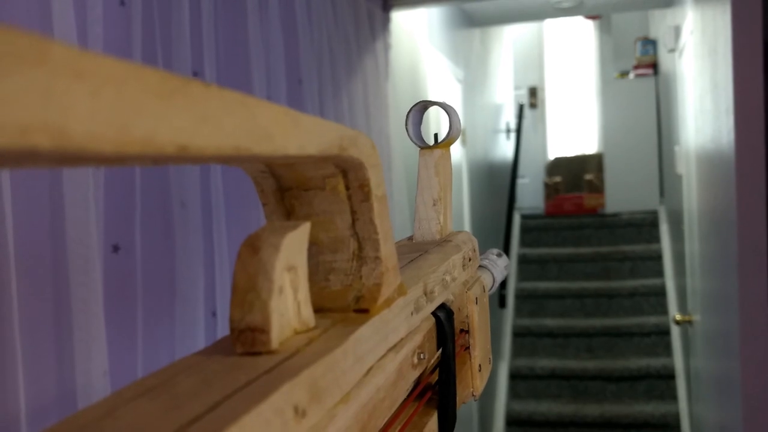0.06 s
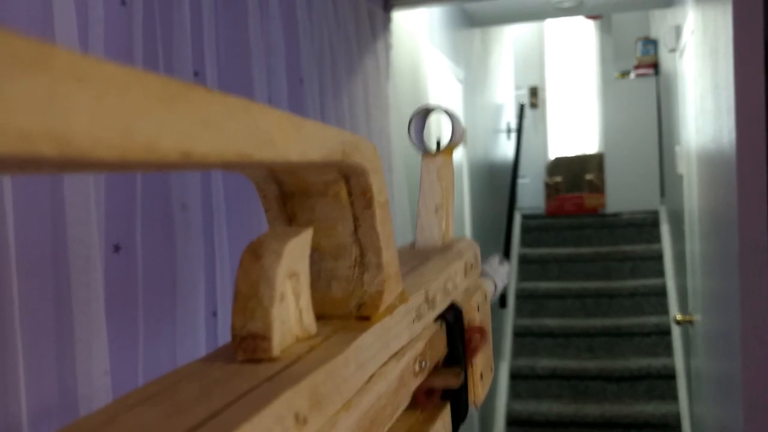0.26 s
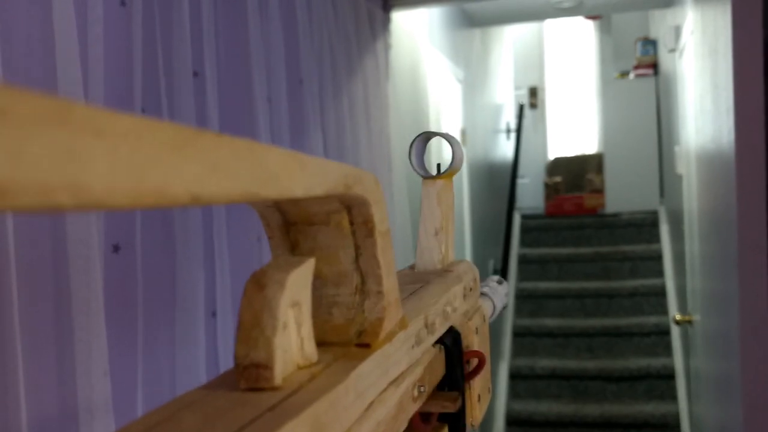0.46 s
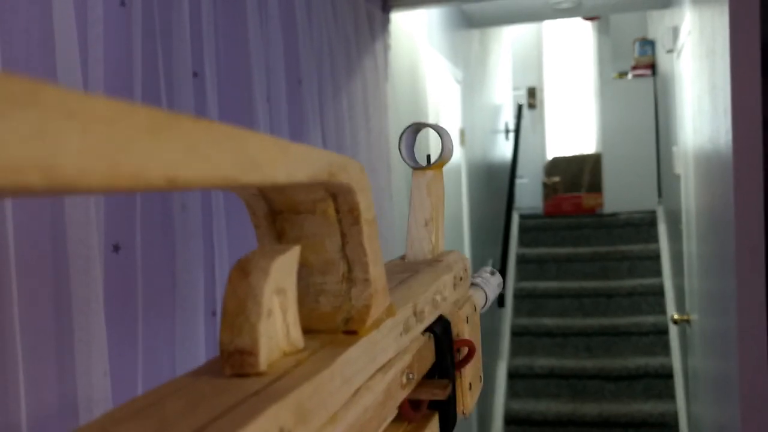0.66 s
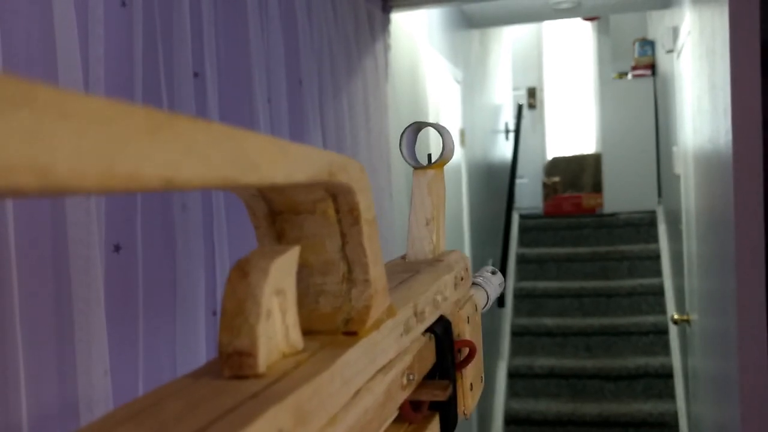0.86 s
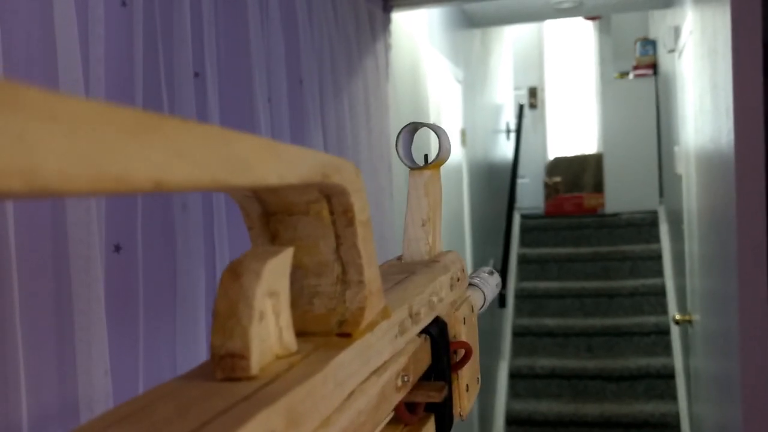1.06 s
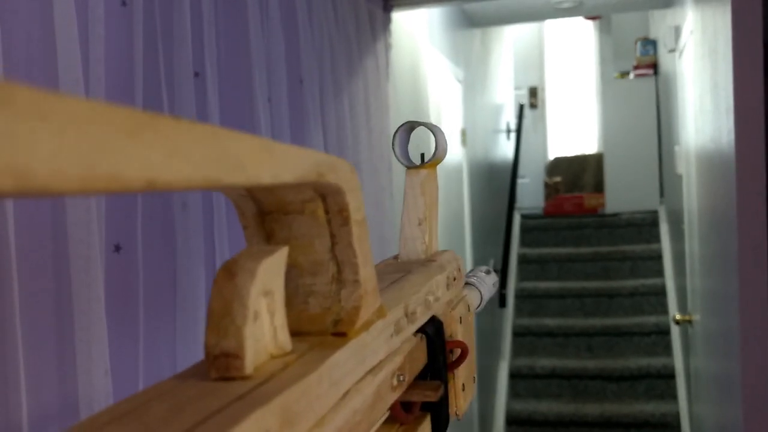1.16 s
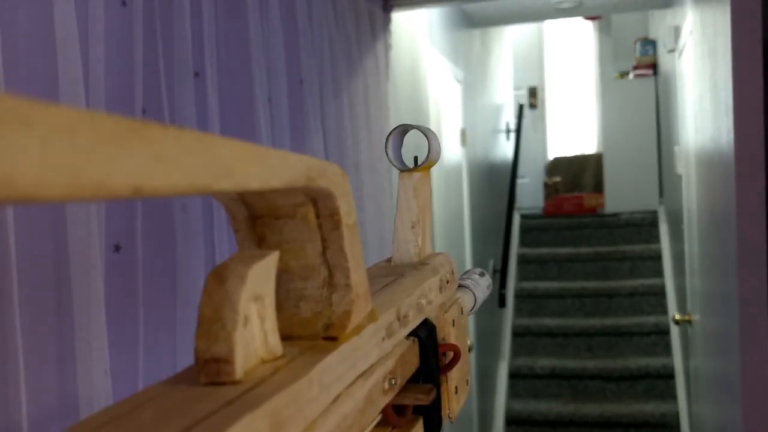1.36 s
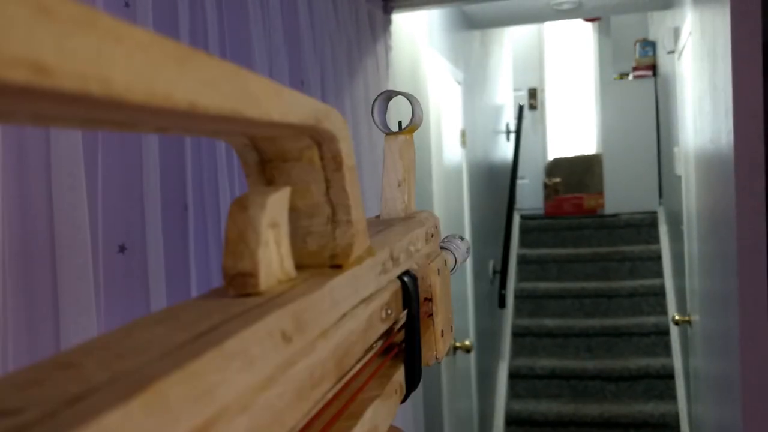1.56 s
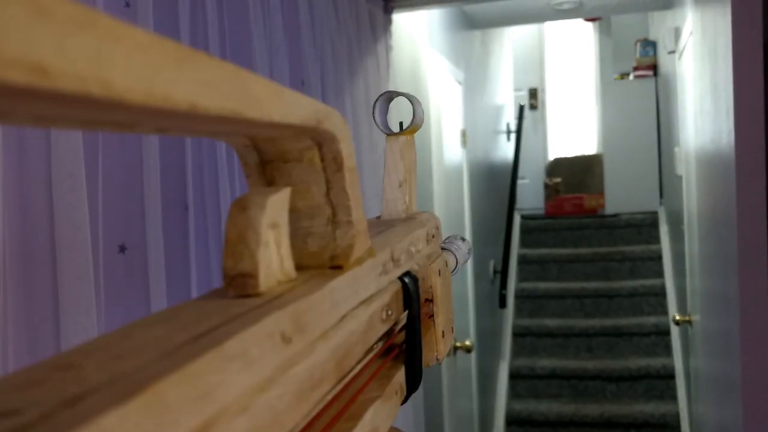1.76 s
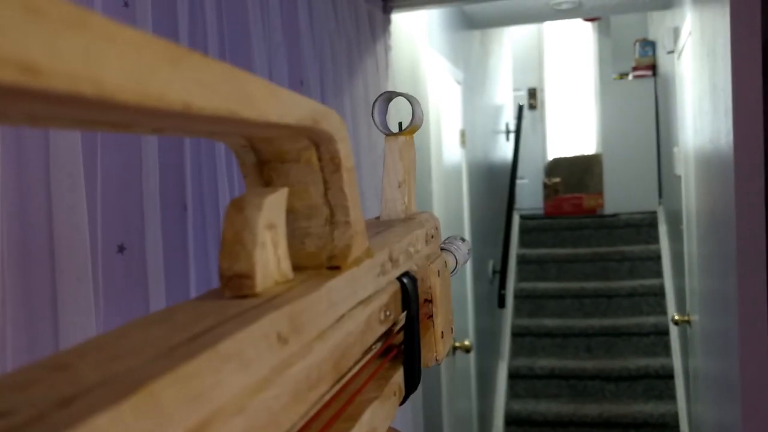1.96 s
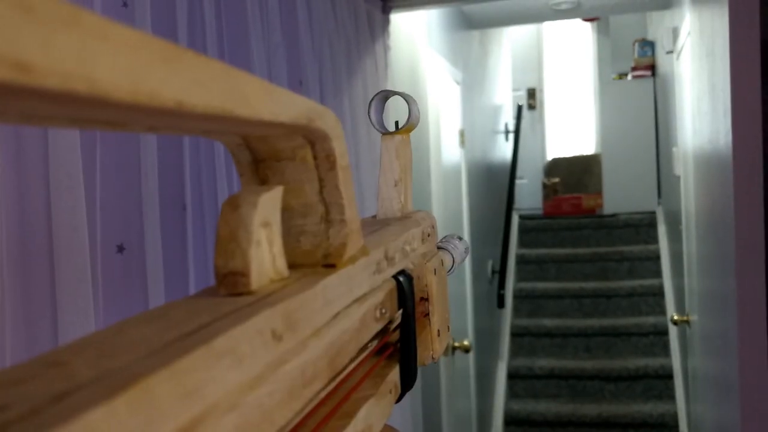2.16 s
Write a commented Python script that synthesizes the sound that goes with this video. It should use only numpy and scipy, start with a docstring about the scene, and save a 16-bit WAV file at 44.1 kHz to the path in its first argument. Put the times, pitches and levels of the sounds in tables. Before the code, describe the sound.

A wooden slingshot rifle fires once beside the microphone with a sharp overloaded rubber snap, a hollow wooden knock follows down a narrow hallway, then soft bounces, low hiss, and handling rumble returning.

```python
"""Slingshot rifle shot in a hallway

A wooden slingshot rifle fires once in a narrow hallway, right beside the microphone. Shaped noise makes the
rubber swish, crack, flap and slap; damped sines make the air puff and the knock on a board down the hall.
The shot then clacks off a hard surface and drops with soft thuds, all answered by decaying hall noise.
Hiss, hum and handling rumble lie underneath; they sink after the shot and later return."""
import sys
import numpy as np
from scipy import signal
from scipy.fft import rfft, irfft
from scipy.io import wavfile

SR = 44100
rng = np.random.default_rng(int(sys.argv[2]) if len(sys.argv) > 2 else 0)


def waveform_to_disk(signal):
    """Save audio, clipped to [-1, 1], as 16-bit WAV at the path in sys.argv[1]."""
    frames = np.transpose(np.atleast_2d(signal))
    scaled = np.clip(frames, -1, 1) * 32767
    samples = np.round(scaled).astype(np.int16)
    wavfile.write(sys.argv[1], SR, samples)


N = 97020
T = np.arange(N) / SR  # seconds
HZ = np.fft.rfftfreq(2 * N, 1 / SR)

SNAP_S, SLAP_S = .2371, .2622  # the crack; the rubber reaching the end of its throw


def amp(db):
    """Decibels to gain."""
    return 10 ** (np.asarray(db) / 20)


def unit(x):
    """Scales to rms 1."""
    return x / np.sqrt(np.mean(x ** 2) + 1e-20)


def read(points, hz):
    """Reads a table on a log-frequency axis."""
    f, value = np.transpose(points)
    return np.interp(np.log(hz + 1), np.log(f + 1), value)


def automation(points):
    """Draws a level curve in dB over the whole scene from (seconds, dB) points."""
    return np.interp(T, *np.transpose(points))


def colour(x, spectrum):
    """Causal (minimum-phase) filter with the given spectrum; rms 1."""
    cepstrum = irfft(np.log(amp(read(spectrum, HZ))))
    # folding the cepstrum forward in time makes the filter causal
    cepstrum[1:N] *= 2
    cepstrum[N + 1:] = 0
    response = np.exp(rfft(cepstrum))
    return unit(irfft(rfft(x, 2 * N) * response)[..., :N])


def noise(spectrum):
    """Two unrelated noises of one colour, rms 1 together."""
    white = rfft(rng.standard_normal((2, N)))
    return unit(irfft(white * amp(read(spectrum, HZ[::2])), N))


def envelope(start, rise, hold, fall):
    """Linear rise, then an exponential fall that begins hold seconds after the start."""
    return np.clip((T - start) / rise, 0, 1) * np.exp(-np.maximum(T - start - hold, 0) / fall)


def flutter(step, depth_db):
    """A random gain gliding to a new value every step seconds; depth_db is its spread."""
    knots = np.arange(4096) * step
    return amp(depth_db * np.interp(T, knots, rng.standard_normal(len(knots))))


def ring(start, hz, rise, fall):
    """One damped vibration; a negative hz turns it upside down."""
    return np.sin(2 * np.pi * hz * (T - start)) * envelope(start, rise, 0, fall)


def modes(start, table, rise):
    """A struck object ringing in its modes, each starting up to one cycle late."""
    return sum(amp(db) * ring(start + rng.random() / hz, hz, rise, t60 / np.log(1000))
               for hz, db, t60 in table)


def hall(start, spectrum, rise, linger):
    """The hallway's answer to a blow: echoes linger between the walls, then each band dies at its own speed."""
    # Decay of the hall. Each row: frequency in Hz, time to fall by 60 dB in seconds.
    decay = [(100, 0.34), (400, 0.26), (1000, 0.24), (3000, .26), (7000, 0.29), (15000, 0.36)]
    hz, t, z = signal.stft(noise(spectrum), SR, nperseg=512)
    age = np.hypot(np.maximum(t - start, 0), linger) - linger  # nearly flat at first
    fade = amp(-60 * age / read(decay, hz)[:, None])
    tail = signal.istft(z * fade, SR, nperseg=512)[1][:, :N]
    return tail * np.clip((T - start) / rise, 0, 1)


def rumble():
    """Small irregular bumps of handling over a bed of low noise, opposite in the two channels."""
    # Colour of the rumble. Each row: frequency in Hz, level in dB per Hz.
    spectrum = [(20, -24), (60, -13), (140, 4), (250, -2), (450, -9), (900, -27), (2500, -29.5),
                (16000, -57)]
    # How the rumble sinks and returns. Each row: time in seconds, level change in dB.
    level = [(0, 11), (.22, 9.5), (.33, -18.5), (.44, -14), (.65, -11.5), (.95, -6.5), (1.43, -9),
             (1.475, 4.5), (1.62, 5.5), (2.2, 4.5)]
    bumps_per_s = 330
    bumps = rng.standard_normal(N) * (rng.random(N) < bumps_per_s / SR)
    low = colour(unit(bumps) + .5 * rng.standard_normal(N), spectrum)
    return amp(-46 + automation(level)) * np.array([low, -low])


def crackle():
    """A fine, faint, fairly even crackle in the hiss while it is low: decaying bursts of noise."""
    # Colour of the crackle. Each row: frequency in Hz, level in dB per Hz.
    spectrum = [(60, -5), (300, -6.5), (1200, -7.5), (2200, -11), (5000, -9), (16000, -15.5)]
    # How the crackle comes and goes. Each row: time in seconds, level change in dB.
    level = [(.6, -31.5), (.84, 3), (.92, 0), (1.01, 4.5), (1.07, -5), (1.17, -6), (1.28, 0), (1.44, -2),
             (1.5, -31)]
    crackles_per_s, fall_s = 45, .0018
    pace = crackles_per_s * flutter(step=0.0078, depth_db=4)
    # one impulse each time the running count passes a whole number
    impulses = np.diff(np.floor(np.cumsum(pace) / SR), prepend=0) * rng.uniform(0.32, 1, N)
    bursts = unit(signal.lfilter([1], [1, -np.exp(-1 / (fall_s * SR))], impulses))
    return amp(-62.5 + automation(level)) * bursts * noise(spectrum)


def background():
    """Hiss and mains hum (steady sines), sinking after the shot and returning; crackle on top."""
    # How hiss and hum sink and return. Each row: time in seconds, level change in dB.
    level = [(0, 3), (.23, 3), (.3, -24.5), (.41, -21.5), (.46, -27.5), (.62, -7), (.85, -14.5),
             (1.0, -13.5), (1.05, -17), (1.12, -7.5), (1.3, -15.5), (1.44, -13.5), (1.472, -0.5),
             (1.62, -1.5), (2.2, -2)]
    # Colour of the hiss. Each row: frequency in Hz, level in dB per Hz.
    hiss_colour = [(30, -19), (120, 1), (300, 0.5), (600, -3.5), (1100, -4), (1800, -11), (2300, -10.5),
                   (3500, -11.5), (7000, -16), (10000, -18.5), (16000, -24)]
    # Partials of the hum. Each row: frequency in Hz, level in dB.
    partials = [(119, -58), (178, -62.5), (238, -57.5), (297.5, -64.5), (358, -62), (418, -65.5)]
    level_db = automation(level)
    # the hiss flickers while it is low: full depth from 9 dB down
    flicker = flutter(step=0.0022, depth_db=5 * np.clip(-level_db / 9, 0, 1))
    hiss = amp(-45) * flicker * noise(hiss_colour)
    hum = sum(amp(db) * np.sin(2 * np.pi * (hz * T + rng.random())) for hz, db in partials)
    return amp(level_db) * (hiss + hum) + crackle()


def ticks():
    """The wooden stock ticks in the hand: a short damped tone and a rasp of noise each."""
    # Small ticks. Each row: start in seconds, level in dB, pitch in Hz, fall in seconds.
    events = [(.088, -42, 2200, .006), (1.592, -24, 2260, 0.0026), (1.6098, -33, 2420, 0.0019)]
    # Colour of the rasp. Each row: frequency in Hz, level in dB per Hz.
    rasp_colour = [(200, -14), (1200, -10), (1600, 0), (2600, -14), (3800, -26), (7000, -20), (14000, -31)]
    rings = sum(amp(db) * ring(s, hz, .0007, fall) for s, db, hz, fall in events)
    rasp = sum(amp(db - 13) * envelope(s, .0005, 0, fall) for s, db, hz, fall in events)
    return rings + rasp * noise(rasp_colour)[0]


def bounces():
    """The shot clacks off something hard far away and thuds softly on the floor, whose modes ring."""
    # Colour of the clack. Each row: frequency in Hz, level in dB per Hz.
    clack_colour = [(50, -20), (150, 4.5), (400, -0.5), (1150, 4.5), (1900, -8), (3200, 0.5), (4700, -3.5),
                    (7500, -6.5), (10000, -14.5), (16000, -20)]
    # Soft thuds. Each row: start in seconds, level in dB.
    drops = [(.683, -43.5), (.785, -52), (1.0865, -41), (1.179, -49.5)]
    # Colour of a thud. Each row: frequency in Hz, level in dB per Hz.
    thud_colour = [(50, -16), (140, -3.5), (310, 1), (400, 0), (500, 2), (630, -9), (800, 1), (1300, -33),
                   (2500, -18), (6000, -25.5), (16000, -40)]
    # The floor's modes. Each row: frequency in Hz, level in dB, time to fall by 60 dB in seconds.
    floor = [(326, -3.5, 0.18), (433, -4, 0.21), (501.7, 1, 0.19), (624, -12, 0.29), (744, -4.5, 0.2)]
    clack_s, echo_delay_s = .7005, 0.015
    clack = amp(-33) * envelope(clack_s, .001, .004, 0.015) * noise(clack_colour)
    clack += amp(-32.5) * hall(clack_s + echo_delay_s, clack_colour, rise=0.0022, linger=0.013)
    thuds = 0
    for s, db in drops:
        body = amp(-1.0) * hall(s, thud_colour, rise=0.0065, linger=.012)
        thuds = thuds + amp(db) * (body + modes(s, floor, rise=0.01))
    return clack + thuds


def knock():
    """The shot hits a board: a hard blow, a low thump and ringing modes, then early echoes and the hall."""
    # The board's modes. Each row: frequency in Hz, level in dB, time to fall by 60 dB in seconds.
    board_modes = [(256.4, -9, 0.35), (318.7, -7, .2), (348.4, -5, .22), (368, -5.5, 0.25),
                   (539, -6.5, 0.23), (640, -9.5, 0.17), (669.5, -0.5, 0.16), (710, -5, 0.16),
                   (766, -0.5, 0.24), (830, -10, 0.17), (864, -9, 0.32), (981, -8, .2), (1035, -6, 0.31),
                   (1138, -10.5, 0.24), (1706, -8, 0.068), (1850, -8, 0.1), (2010, -9, 0.32)]
    # Colours of the noisy edge, the echoes and the hall. Each row: frequency in Hz, level in dB per Hz.
    edge_colour = [(80, -19), (330, -2), (900, -5), (1400, -3.5), (1950, 0.5), (2700, -5), (4500, -11.5),
                   (6300, -11.5), (8000, -23.5), (11000, -30.5), (16000, -33)]
    echo_colour = [(150, -11.5), (900, -5.5), (2000, 3), (3200, -3.5), (4700, 5.5), (7000, -6),
                   (10000, -23), (16000, -34)]
    hall_colour = [(50, -32.0), (130, -20.5), (250, -9), (350, -4.5), (450, -9), (530, -4.5), (600, -11),
                   (780, 0.0), (1050, -4), (1400, -9.5), (1900, -10), (2600, -15), (3200, -16),
                   (3750, -19.5), (4500, -15), (5500, -25), (6400, -20.5), (7500, -30.0), (8200, -33.5),
                   (9400, -30), (10500, -49), (12500, -39), (15200, -50.5)]
    # Early echoes. Each row: delay after the knock in seconds, level in dB.
    reflections = [(0.0128, -19.5), (0.0238, -29.5), (.033, -30.5), (.043, -29)]
    start = .4702  # seconds
    blow = -amp(0.5) * ring(start, 860, 0.0016, 0.0032)
    thump = amp(-31.5) * ring(start, 144.2, .001, 0.015)
    thump += amp(-17) * ring(start, 360, .003, 0.0091)
    board = amp(-19.5) * modes(start, board_modes, rise=0.0091)
    far_wall = amp(-15.5) * ring(start + .042, 790, .003, 0.014)

    edge = amp(-13.5) * envelope(start, 0.00055, 0.00037, 0.0033) * noise(edge_colour)
    echo_level = sum(amp(db) * envelope(start + delay, 0.00081, 0.0011, 0.0027)
                     for delay, db in reflections)
    echoes = echo_level * noise(echo_colour)
    tail = amp(-16.5) * hall(start, hall_colour, rise=0.015, linger=0.019)
    tail = tail * flutter(step=.003, depth_db=1.5)
    return blow + thump + board + far_wall, edge + echoes + tail


def puff():
    """Air thrown by the rubber pushes the two ports in opposite directions, unevenly, with noisy eddies."""
    # Colour of the eddies. Each row: frequency in Hz, level in dB per Hz.
    eddy_colour = [(25, -23), (70, -10), (160, -7), (400, -5.5), (900, -16), (4000, -47)]
    push = ring(SLAP_S, 183.8, .0005, .003)
    push += amp(-15.5) * ring(SLAP_S + 0.0034, -105, .001, 0.0043)
    eddies = amp(-24.5) * envelope(SLAP_S, .002, 0.0013, 0.0051) * noise(eddy_colour)
    return amp(-4.5) * np.array([-push, 1.1 * push]) + eddies


def snap():
    """The rubber swishes, cracks, flails and slaps at the end of its throw; the rifle rings and the hall answers."""
    # Colours of the crack, the moving rubber and the hall. Each row: frequency in Hz, level in dB per Hz.
    crack_colour = [(100, -35), (500, -18.5), (1000, -6.5), (1600, 1), (2300, -4.5), (3000, -2.5),
                    (4200, 1), (6500, -7), (8200, -6), (10800, -5), (12500, -15), (15200, -15.5)]
    rubber_colour = [(100, -12.5), (500, -10.5), (1100, -3.5), (1900, -7), (3000, 1), (4500, -0.5),
                     (5600, -2.5), (7500, 1), (10000, -9), (15200, -10)]
    hall_colour = [(100, -24), (350, -15), (800, -5.5), (1200, -9.5), (2300, -8), (3300, -1.5), (5500, 0),
                   (7500, -4.5), (11000, -11), (15200, -17.5)]
    # The rifle's modes. Each row: frequency in Hz, level in dB, time to fall by 60 dB in seconds.
    rifle_modes = [(1210, -6, .14), (2818, -4, .1), (3928, 0, .12), (4240, 0, .14), (4537, 0, .14),
                   (4694, -2, .13), (4849, -1, .14), (5020, -1, .12), (6250, -4, .14), (7520, -6, .13)]
    swell_db_per_s, hall_t60_s = 856, 0.22
    # the rubber speeds up until the crack
    swish = amp(-25.5 - swell_db_per_s * abs(SNAP_S - T)) * (T < SNAP_S)
    # then the slack rubber flails
    flap = amp(-19.5) * envelope(SNAP_S, .001, .027, 0.0018) * flutter(step=.0015, depth_db=2.7)
    slap = amp(-15.5) * envelope(SLAP_S, 0.0005, 0.00075, 0.00044)
    rubber = (swish + flap + slap) * noise(rubber_colour)
    crack = amp(3) * envelope(SNAP_S, 0.00032, 0.0034, .0005) * noise(crack_colour)
    tail = amp(-17) * envelope(SNAP_S, 0.017, 0, hall_t60_s / np.log(1000)) * noise(hall_colour)
    rifle = amp(-30.5) * modes(SNAP_S, rifle_modes, rise=.002)
    return crack + rubber + tail + rifle


def ports(direct, diffuse):
    """The microphone pair: each frequency reaches one port later; diffuse sound is only partly alike."""
    # Phase between the ports. Each row: frequency in Hz, lead of the left port in radians.
    port_phase = [(0, -.3), (500, -.4), (1100, -.6), (1500, -1.1), (1700, .3), (1920, 2.3), (2300, 1.4),
                  (2800, -.8), (3200, -1.8), (3600, -3.14)]
    # Left-right likeness of diffuse sound. Each row: frequency in Hz, likeness from 0 to 1.
    likeness = [(50, 0.27), (350, .93), (1050, 0.9), (1500, 0.2), (2100, .94), (2550, 0.36), (3200, 0.91),
                (15000, .93)]
    delay_s = .000562  # above the phase table, a plain delay
    near = rfft(direct, 2 * N)
    a, b = rfft(diffuse, 2 * N)
    same = np.clip(read(likeness, HZ), 0, 1)
    left = near + same * a + np.sqrt(1 - same ** 2) * b
    right = near + a

    f, turn = np.transpose(port_phase)
    lead = np.interp(HZ, f, turn) - 2 * np.pi * delay_s * np.maximum(HZ - f[-1], 0)
    step = np.diff(lead, prepend=0)
    # a rising lead delays the right port, a falling one the left
    lag = np.cumsum(np.maximum([-step, step], 0), axis=1)
    return irfft(np.array([left, right]) * np.exp(-1j * lag))[:, :N]


def scene():
    """All sources at the microphone pair; puff and rumble act on the ports themselves."""
    direct, diffuse = knock()
    heard = ports(direct + ticks(), diffuse + snap() + bounces() + background())
    return heard + puff() + rumble()


def record(dry):
    """The crack overloads the input and clips; then the low cut and the band limit."""
    overload, low_cut_hz, edge_hz = 0.99, 65, 15600
    clipped = np.clip(dry, -overload, overload)
    low_cut = signal.butter(1, low_cut_hz, "high", fs=SR, output="sos")
    band_limit = signal.firwin(511, edge_hz, window=("kaiser", 9), fs=SR)
    return signal.oaconvolve(signal.sosfilt(low_cut, clipped), band_limit[None], "same")


dry = scene()
out = record(dry)
waveform_to_disk(out)
```